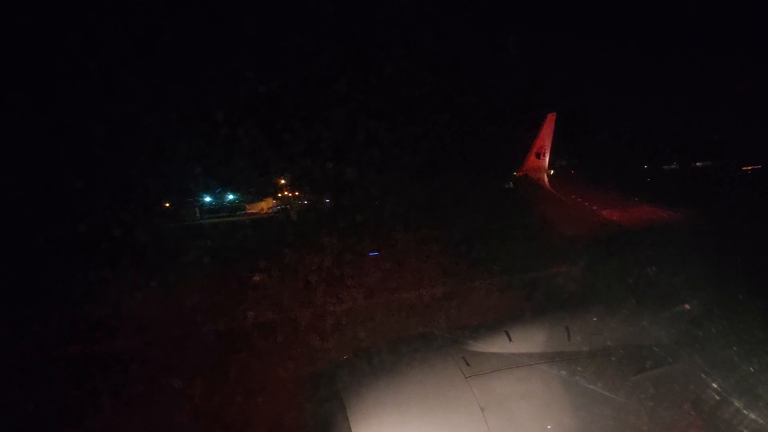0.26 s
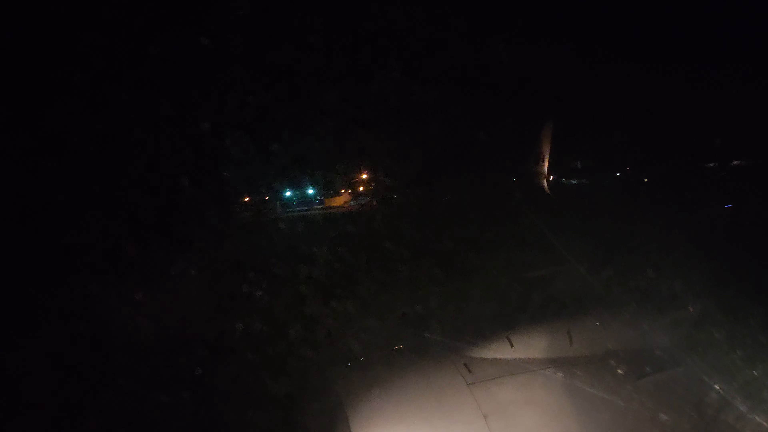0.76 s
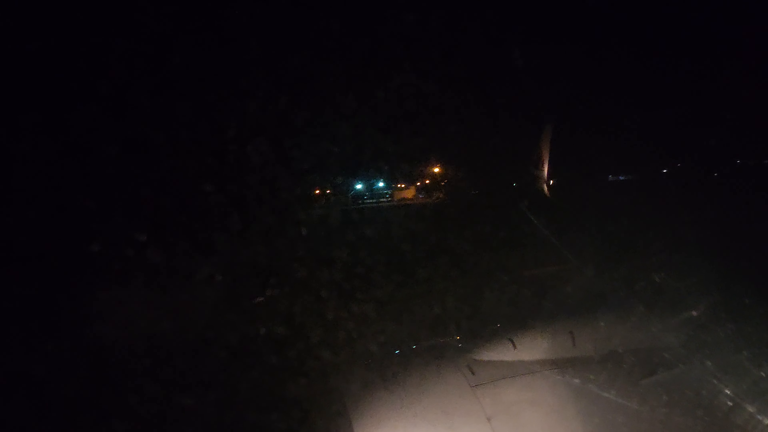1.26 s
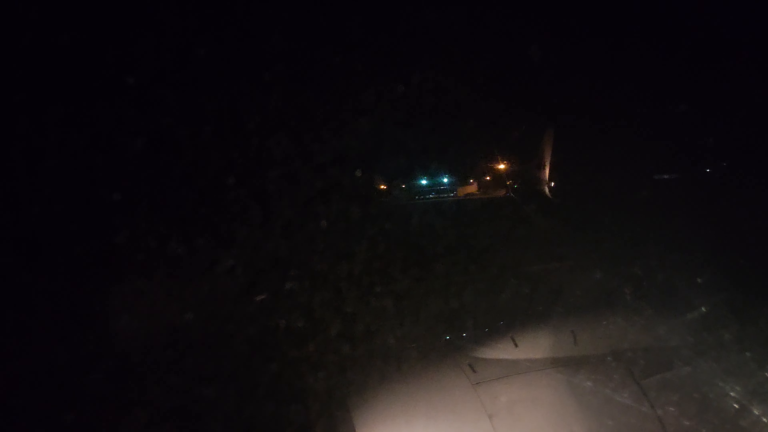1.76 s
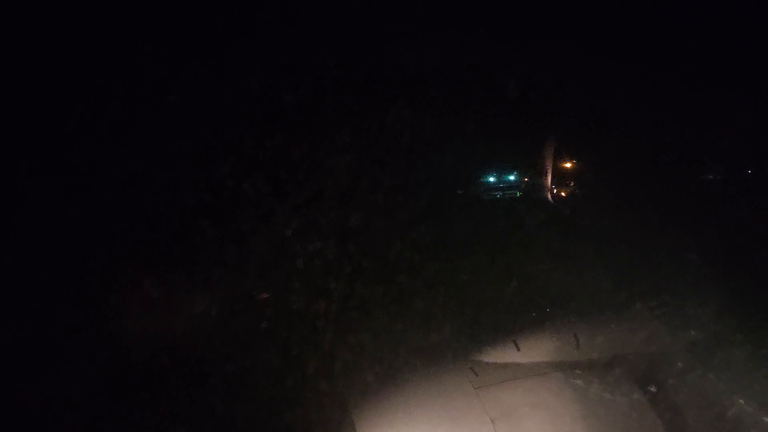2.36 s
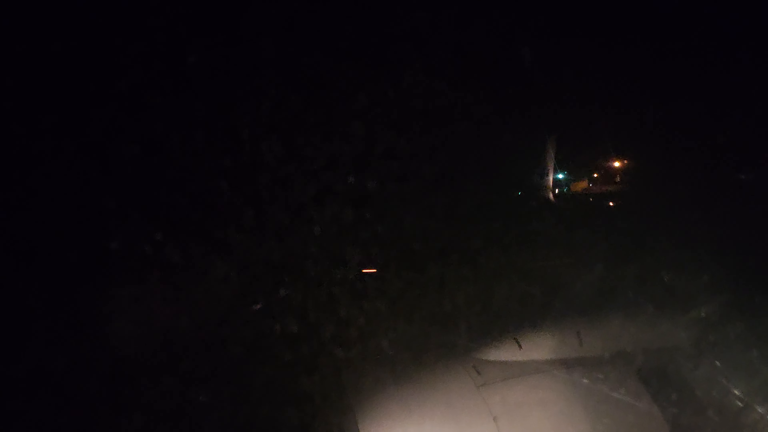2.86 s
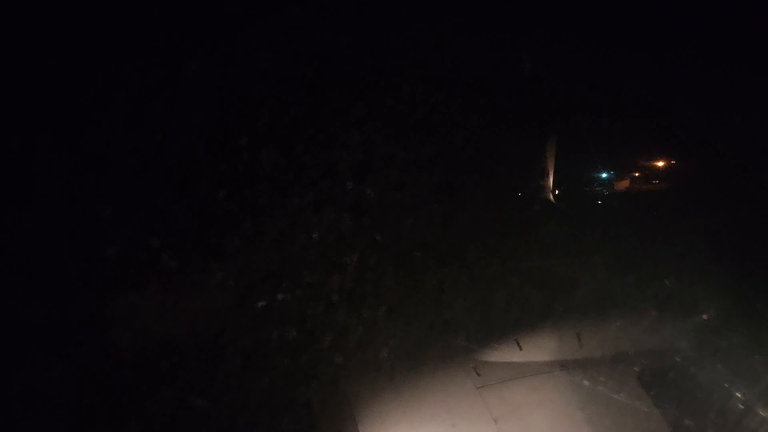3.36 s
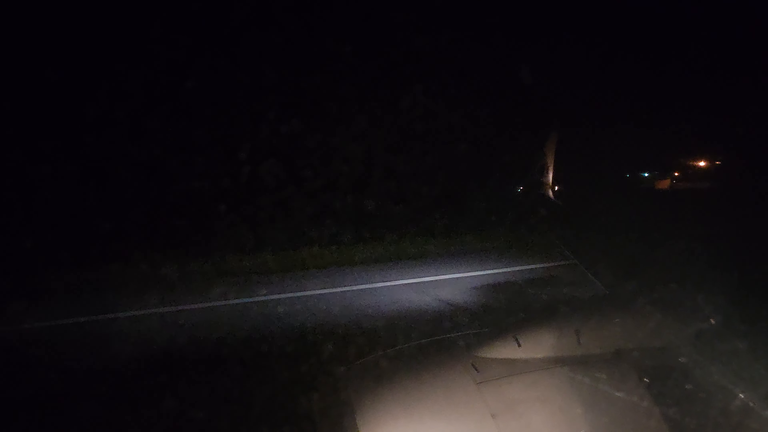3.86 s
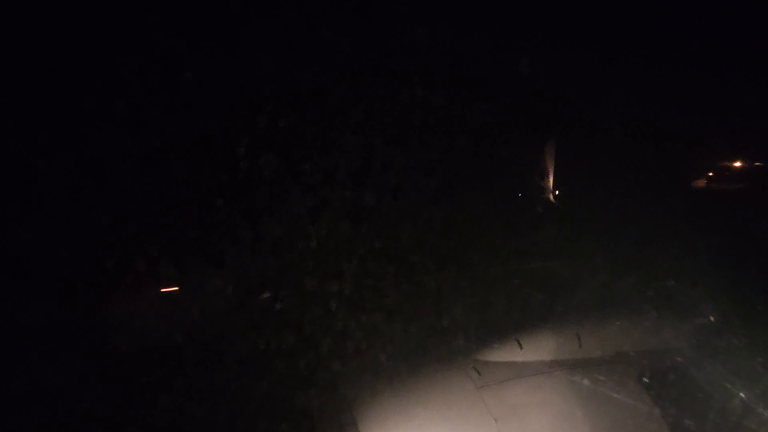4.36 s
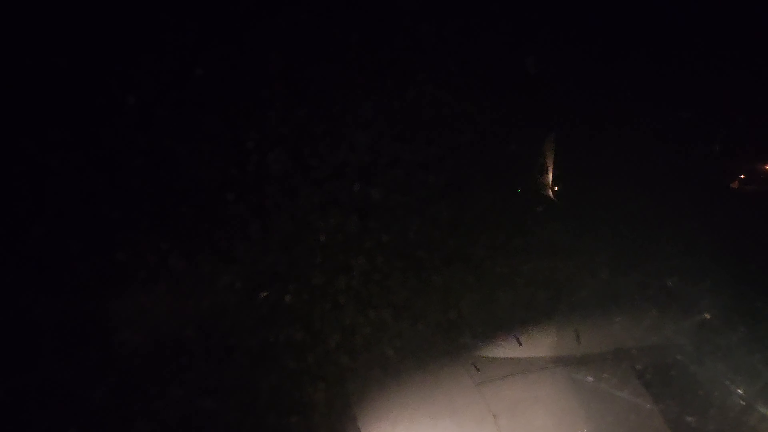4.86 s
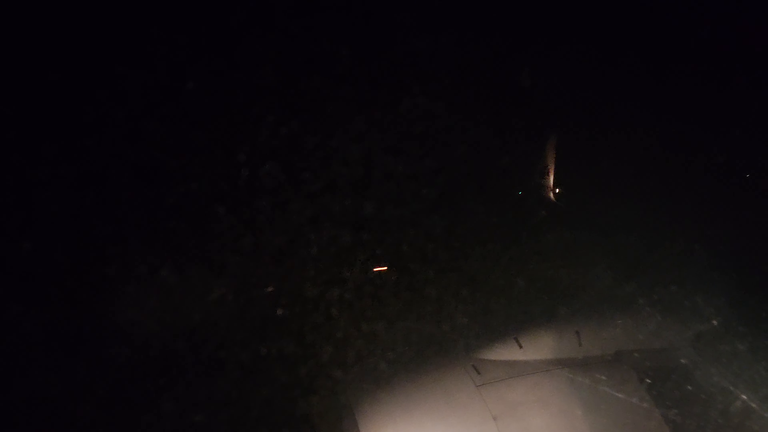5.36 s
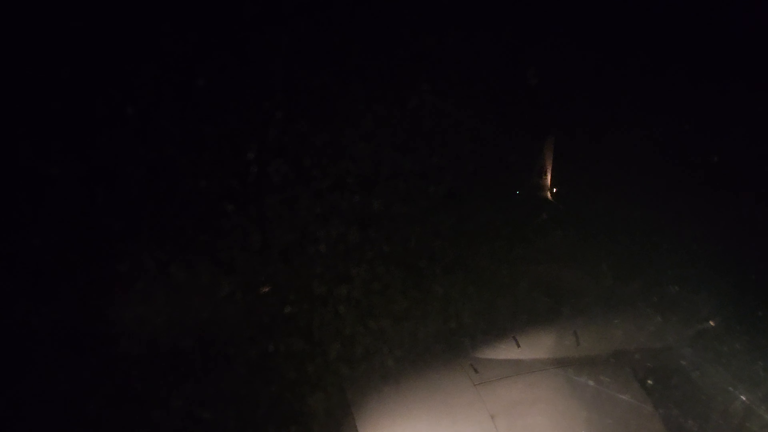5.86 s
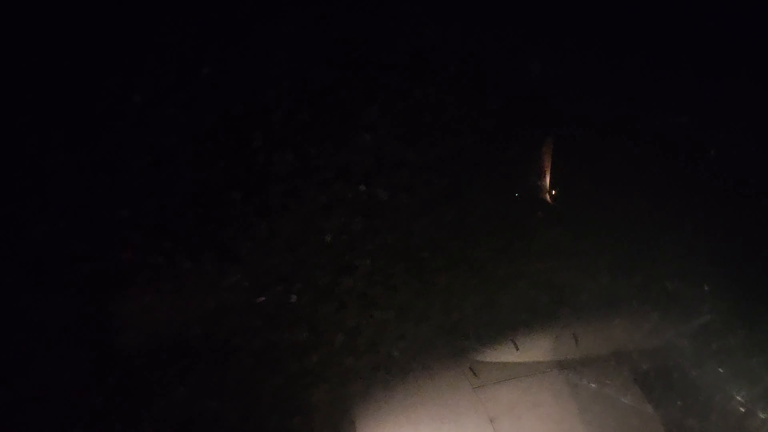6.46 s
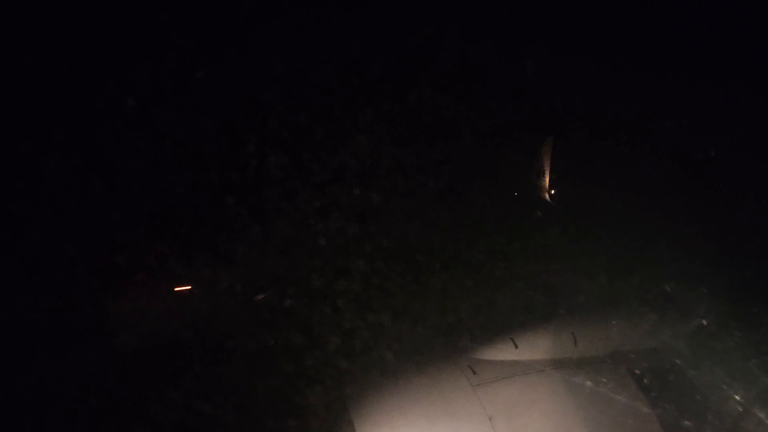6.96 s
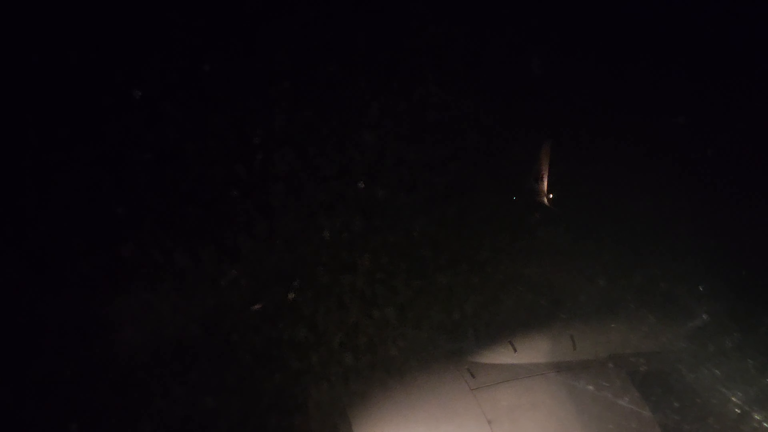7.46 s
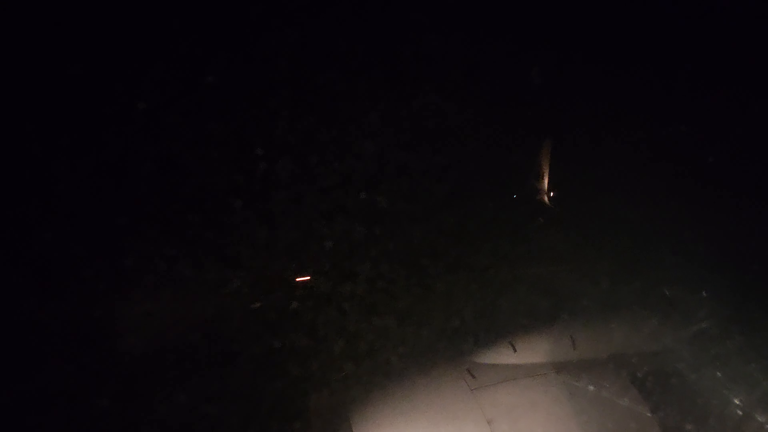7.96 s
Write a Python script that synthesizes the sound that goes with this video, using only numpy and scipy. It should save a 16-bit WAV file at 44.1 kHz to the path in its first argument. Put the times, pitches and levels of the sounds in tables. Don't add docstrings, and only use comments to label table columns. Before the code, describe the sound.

Steady vent hiss and low engine drone, a bumpy touchdown with rattling plastic, then heavy braking roar that distorts the microphone until the end.

```python
import sys
import numpy as np
from scipy import signal
from scipy.fft import rfft, irfft, next_fast_len
from scipy.io import wavfile
from scipy.ndimage import uniform_filter1d, minimum_filter1d

SR = 44100
rng = np.random.default_rng(int(sys.argv[2]) if len(sys.argv) > 2 else 0)


def generate_wav(signal):
    frames = np.transpose(np.atleast_2d(signal))
    scaled = np.clip(frames, -1, 1) * 32767
    pcm = np.round(scaled).astype(np.int16)
    wavfile.write(sys.argv[1], SR, pcm)


def invert_db(x):
    u = np.asarray(x, float) / 20
    return 10 ** u


N = 361619

# freq_hz, density_db (per Hz)
RUSH_COLOUR = [(300, -20.5), (450, -6), (560, -5), (660, -9.5), (780, -1), (900, -9.5), (1000, -11),
               (1110, -14), (1400, -12.5), (1520, -28.5), (1900, -26), (2470, -60), (4180, -120)]
# freq_hz, density_db (per Hz)
HISS_COLOUR = [(1100, -29.5), (1500, -0.5), (2000, 0), (2280, -5.5), (2500, -2.5), (2900, -3), (3200, -8.5),
               (3750, -8), (4150, -12), (4600, -11), (5300, -15.5), (6300, -18.5), (6700, -28), (8000, -45)]
# freq_hz, density_db (per Hz)
SIZZLE_COLOUR = [(4500, -32.5), (6500, -4), (7100, -2.5), (8100, -3.5), (9500, 0.5), (10900, -4),
                 (11600, 0), (12600, -5.5), (14200, -5.5), (15000, -7)]
# pitch_hz, width_hz, level_db
DUCT_NOTES = [(1209.5, 43, -50), (2038, 160, -55.5), (1354, 61, -56.5), (994, 110, -52)]
# start_s, lift_db, length_s
SHUDDERS = [
    (0.624, 5.5, 0.42),
    (1.296, 4.5, 0.085),
    (2.14, -0.5, .2),
    (2.988, 5.5, .12),
    (5.102, 2, 0.49),
    (5.677, 2.5, .2),
]
# start_s, length_s, pitch_hz, width_hz, level_db
SQUEAKS = [
    (1.04, 0.046, 13900, 500, -64),
    (1.15, .09, 13600, 397, -58),
    (2.448, 0.037, 9450, 400, -50.5),
    (.66, 0.045, 11400, 895, -57),
    (.85, .05, 12000, 1500, -66),
    (2.42, 0.09, 11000, 3000, -63),
]
# start_s, peak_db, dull_part_db (relative), bright_part_db (relative), pan_db
JOLTS = [(0.3114, -42, 5, -11, -0.5), (0.4998, -30.5, 2.5, -18, -1), (0.52, -35, 1, -15, 2),
         (0.546, -27.5, -5, -16, 3), (0.6534, -33, 0, -16, 5), (0.6883, -33, 2, -28.5, -3),
         (0.712, -39, 6, -22, 3), (0.7994, -38, 3, -18, 4), (0.8594, -35, 0, -18, -1),
         (0.9194, -42, 13, -19.5, -3), (1.3394, -34, 7, -22, 0), (2.0314, -34.5, -2, -15, -2),
         (2.088, -28.5, -6, -15.5, 4), (2.3052, -36, 3, -23.5, 3), (2.3386, -39, 7, -26.5, 0.5),
         (2.806, -36.5, -8, -17, 4), (2.8848, -34, 1, -14, 1), (2.9644, -32, -1, -22, -2.5),
         (2.994, -29, 4.5, -17, 1), (3.018, -33.5, 0, -17, 0.5), (3.052, -25.5, 2, -14, 0),
         (3.0624, -42, -1, -14, -3), (3.1094, -41, 7, -14, -4), (3.1587, -44, 0, -19, -6)]
# pitch_hz, width_hz, level_db
PANELS = [(960, 390, 5.5), (1280, 450, 0), (1920, 360, -3), (2630, 630, -0.5), (3700, 1300, -0.5),
          (5750, 2300, -8.5), (9400, 1800, 7.5), (12800, 3000, 5)]
# freq_hz, density_db (per Hz)
RUMBLE_COLOUR = [(8.8, -55.5), (15, -27), (54, -1), (107, 8), (126, 7.5), (145, -23), (178, 0.5),
                 (250, -14.5), (320, -54), (550, -120)]
# peak_s, level_db, length_s
BUMPS = [(.7, -13.5, 0.047), (.9, -14.5, .1), (1.07, -17, 0.072), (1.3, -17.5, 0.083), (1.74, -23, 0.069),
         (2.03, -15, 0.1), (2.17, -16.5, 0.13), (2.8, -22.5, 0.14), (3.05, -15.5, 0.26), (3.49, -15, 0.071),
         (3.85, -15.5, 0.067), (4.04, -15, 0.12), (4.34, -16, 0.085), (5.1, -15, 0.12),
         (5.34, -12.5, 0.068), (5.58, -25, 0.089), (5.841, -14.5, 0.034), (6.8, -24, 0.19),
         (7.2, -26, 0.14), (8.2, -19, .08)]
# freq_hz, density_db (per Hz)
DRONE_COLOUR = [(24, -57.5), (40, -39), (110, -13), (155, -2.5), (185, -4), (215, -6), (290, -9),
                (390, -14), (520, -24), (800, -40.5), (1040, -72), (1760, -120)]
# freq_hz, density_db (per Hz)
ROAR_COLOUR = [(29, -51), (50, -31), (85, -9), (130, 0.5), (213, 1.5), (242, -1), (335, -2.5), (421, -7.5),
               (461, -13.5), (578, -22.5), (662, -31), (750, -29), (980, -52.5), (1650, -120)]
# time_s, level_db
THRUST = [(0, -18), (.55, -17.5), (1.1, -17.5), (1.7, -16.5), (2.15, -15), (2.5, -13.5), (2.8, -15.5),
          (3.1, -14), (4.3, -11.5), (4.9, -9.5), (5.35, -8.5), (5.9, -8.5), (6.2, -9), (6.9, -8.5),
          (7.9, -9), (8.1, -8), (8.2, -10.5)]
# time_s, share (0-1)
REVERSE = [
    (0, 0.06),
    (1.5, 0),
    (3, 0.5),
    (4.5, 0.8),
    (5.4, 0.98),
    (8.2, 0.95),
]
# peak_s, over_db (above the overload point)
SURGES = [(4.111, .9), (4.631, 2.5), (4.718, 2.7), (4.906, 1.1), (5.296, 1.4), (5.327, 3.3), (5.345, 2.5),
          (5.366, 2.5), (5.408, 2.0), (5.453, 1.5), (5.472, 1.6), (5.548, 1.5), (5.639, 1.1), (5.699, 1.8),
          (5.817, 2.5), (6.021, 1.6), (6.051, 2.5), (6.112, 2.9), (6.148, 3.4), (6.166, 3.7), (6.279, 3.4),
          (6.397, 2.2), (6.479, 2.1), (6.569, 2.0), (6.845, 1.6), (7.028, 1.6), (7.231, 1.6), (7.536, 3.1),
          (8.004, 1.3), (8.079, 2.3)]
# freq_hz, likeness (-1 to 1)
LIKENESS = [(25, .997), (180, .992), (250, .965), (370, .9), (520, .68), (640, .3), (780, -.55), (900, -.2),
            (1020, .4), (1300, .05), (1750, -.35), (2400, .3), (2750, -.2), (4400, .3), (5500, .01)]
# freq_hz, left_minus_right_db
LEAN = [(60, -2), (130, -1.0), (290, 0.5), (620, -2), (1350, 1), (2950, 0.0), (6430, 1.5), (14000, -2.5)]

OVERLOAD = 0.94


def rms_one(x):
    return x / np.sqrt(np.mean(x ** 2) + 1e-20)


def in_time(rows):
    s, *columns = np.transpose(rows)
    return [np.interp(np.arange(N) / SR, s, column) for column in columns]


def at_hz(points, hz):
    points = np.array(points)
    return np.interp(np.log(hz), np.log(points[:, 0]), points[:, 1])


def drift(rate_hz):
    r = np.exp(-80 * np.pi * rate_hz / SR)
    chance = rng.standard_normal(N // 40 + 2002)
    slow = signal.lfilter([1], [1, -2 * r, r * r], chance)[2000:]
    return np.interp(np.arange(N) / 40, np.arange(len(slow)), rms_one(slow))


def swell(peak_s, length_s):
    late = np.arange(N) / SR - peak_s
    return np.exp(-0.5 * (late / (length_s * np.where(late < 0, 0.5, 1))) ** 2)


def resonate(x, hz, width_hz):
    r = np.exp(-np.pi * width_hz / SR)
    feedback = [1, -2 * r * np.cos(2 * np.pi * hz / SR), r * r]
    return signal.lfilter([(1 - r * r) / 2, 0, (r * r - 1) / 2], feedback, x)


def resonate_twice(x, hz, width_hz, second_width_hz):
    return rms_one(resonate(resonate(x, hz, width_hz), hz, second_width_hz))


def turbulence(colour, left_lag_s=0.0):
    size = next_fast_len(N)
    hz = np.arange(size // 2 + 1) * SR / size + 1e-3
    mid, side = rfft(rng.standard_normal((2, size))) * invert_db(at_hz(colour, hz))
    alike = np.clip(at_hz(LIKENESS, hz), -1, 1)
    lean = invert_db(at_hz(LEAN, hz) / 2)
    mid, side = np.sqrt(1 + alike) * mid, np.sqrt(1 - alike) * side
    left = (mid + side) * lean * np.exp(-2j * np.pi * hz * left_lag_s)
    right = (mid - side) / lean
    return rms_one(irfft([left, right], size)[:, :N])


def cabin_air():
    full_thrust_db = -9
    swing_db = in_time(THRUST)[0] - full_thrust_db
    shake_db = sum(lift_db * swell(s, length) for s, lift_db, length in SHUDDERS)
    gusts = drift(12.0)
    rush_db = -35 + swing_db + 0.8 * shake_db
    hiss_db = -47 + 0.41 * swing_db + 0.71 * shake_db
    sizzle_db = -65.5 + 0.2 * swing_db + 0.92 * shake_db
    rush = invert_db(rush_db + 2.5 + 0.87 * gusts) * turbulence(RUSH_COLOUR)
    hiss = invert_db(hiss_db + 3.0 + 0.38 * gusts + 0.26 * drift(20)) * turbulence(HISS_COLOUR)
    sizzle = invert_db(sizzle_db + 5.5 + 0.7 * gusts + 0.7 * drift(14)) * turbulence(SIZZLE_COLOUR)
    white = rng.standard_normal((2, N))
    duct = sum(invert_db(db) * resonate_twice(white, hz, width, width) for hz, width, db in DUCT_NOTES)
    return rush + hiss + sizzle + duct


def squeaks():
    out = np.zeros((2, N))
    for s, length_s, hz, width_hz, db in SQUEAKS:
        start, count = round(s * SR), round(length_s * SR)
        rub = rng.standard_normal((2, count))
        tone = resonate_twice(rub, hz, width_hz, width_hz)
        out[:, start:start + count] += invert_db(db) * tone * np.sqrt(np.hanning(count))
    return out


def trim_rattle():
    ticks_per_s, spread_db = 14000.0, 3.5
    rise_s, buzz_t60_s, knock_t60_s = 0.0024, 0.16, 0.024
    ticks = (rng.random((2, N)) < ticks_per_s / SR) * rng.choice([-1, 1], (2, N))
    ticks = ticks * invert_db(spread_db * np.minimum(rng.exponential(1, (2, N)), 4))
    after = np.arange(SR // 4) / SR
    buzz = 0.86 * invert_db(-60 * after / buzz_t60_s)
    knock = 0.98 * invert_db(-60 * after / knock_t60_s)
    dying = (1 - np.exp(-after / rise_s)) * (buzz + knock)
    shake = np.zeros((3, 2, N))
    for s, db, dull_db, bright_db, pan_db in JOLTS:
        i = round(s * SR)
        parts = invert_db(db - 10 + np.array([dull_db + 4, 0, bright_db]))
        sides = invert_db([[pan_db / 2], [-pan_db / 2]])
        shake[:, :, i:i + len(after)] += parts[:, None, None] * sides * dying
    out = 0
    for k, (hz, width_hz, db) in enumerate(PANELS):
        part = int(hz > 2500) + int(hz > 7500)
        tone = resonate_twice(ticks, hz, width_hz, 2 * width_hz)
        out = out + (-1) ** k * invert_db(db - 2.5) * shake[part] * tone
    return out


def wheels():
    touchdown_s, glide_db, rolling_db = 0.44, -31, -26
    roll_db, = in_time([(touchdown_s - 0.05, glide_db), (touchdown_s + 0.05, rolling_db)])
    bump_power = sum((invert_db(db) * swell(s, length)) ** 2 for s, db, length in BUMPS)
    level = np.sqrt(invert_db(roll_db) ** 2 + bump_power)
    shake = invert_db(2.0) * level * turbulence(RUMBLE_COLOUR, left_lag_s=0.00035)
    return signal.sosfilt(signal.butter(2, 32, "high", fs=SR, output="sos"), shake)


def engines():
    hum_hz, hum_width_hz, hum_db = 184, 4, -8
    share = np.clip(in_time(REVERSE)[0], 0, 1)
    drone = np.sqrt(1 - share) * turbulence(DRONE_COLOUR)
    roar = np.sqrt(share) * turbulence(ROAR_COLOUR)
    hum = rms_one(resonate(rng.standard_normal(N), hum_hz, hum_width_hz))
    hum = (1 - share) * invert_db(hum_db) * hum
    return invert_db(in_time(THRUST)[0] + 0.5) * (drone + roar + hum)


def surge(hull):
    usual_top, cycles = 0.99, 0.45
    surge_hz, spread, lift_db = 238, 0.12, 0.7
    swing = np.abs(signal.hilbert(hull.mean(axis=0), next_fast_len(N))[:N])
    give = minimum_filter1d(np.minimum(1, usual_top / swing), size=400)
    hull = hull * uniform_filter1d(uniform_filter1d(give, size=300), size=300)
    reach = SR // 40
    around = np.arange(-reach, reach) / SR
    for s, over_db in SURGES:
        luck, coin = rng.uniform(-1, 1, 2)
        hz = surge_hz * (1 + spread * luck)
        height = np.sign(coin) * OVERLOAD * invert_db(over_db + lift_db)
        wave = height * np.cos(2 * np.pi * hz * around)
        bell = np.exp(-0.5 * (around * hz / cycles) ** 2)
        start = round(s * SR) - reach
        span = slice(start, start + len(around))
        hull[:, span] += bell * (wave - 0.92 * hull[:, span])
    return hull


def airframe():
    return surge(wheels() + engines())


def scene():
    return cabin_air() + squeaks() + trim_rattle() + airframe()


def low_pass(x):
    return signal.sosfilt(signal.butter(12, 14620, fs=SR, output="sos"), x)


def record(dry):
    knee, top_hz = 26, 14650
    flat = dry / (1 + np.abs(dry / OVERLOAD) ** knee) ** (1 / knee)
    dulled = signal.sosfiltfilt(signal.cheby2(12, 40, top_hz, fs=SR, output="sos"), flat)
    fade_in = np.minimum(1, (np.arange(N) + 1) / 200)
    return low_pass(dulled * fade_in)


dry = scene()
out = record(dry)
generate_wav(out)
```